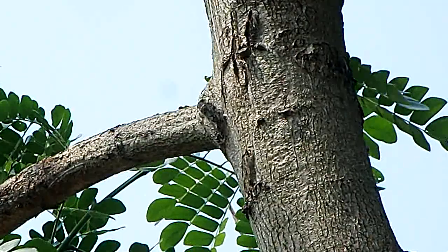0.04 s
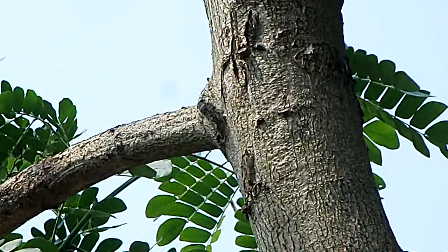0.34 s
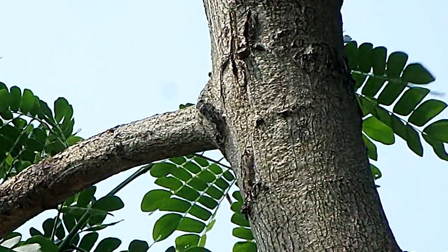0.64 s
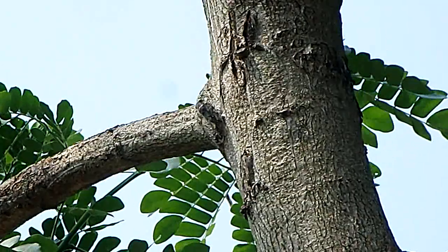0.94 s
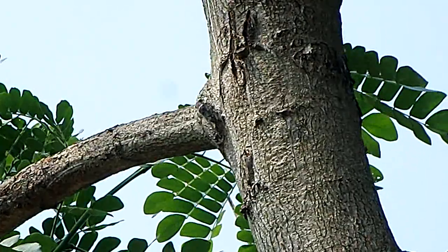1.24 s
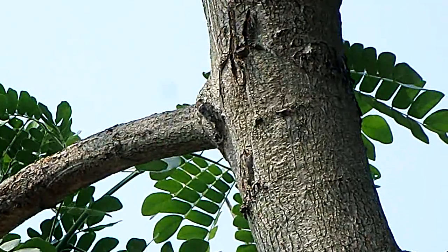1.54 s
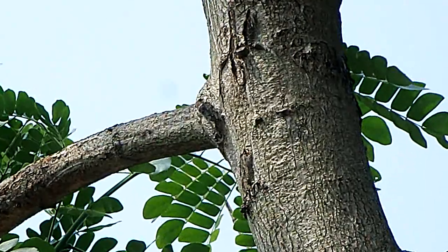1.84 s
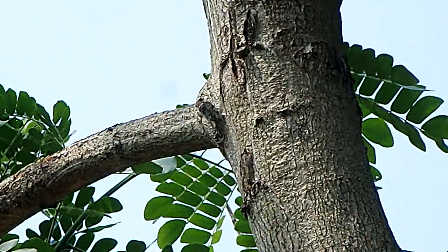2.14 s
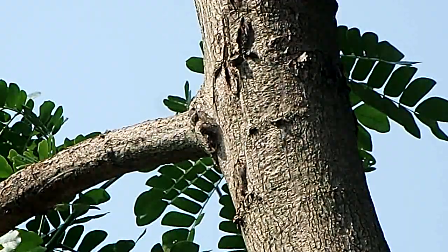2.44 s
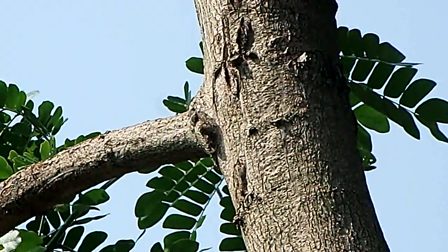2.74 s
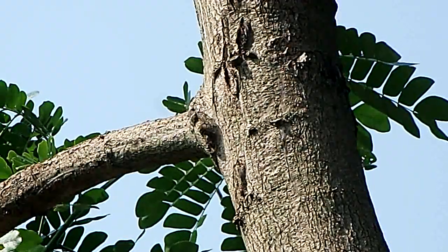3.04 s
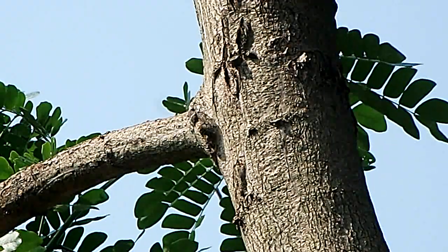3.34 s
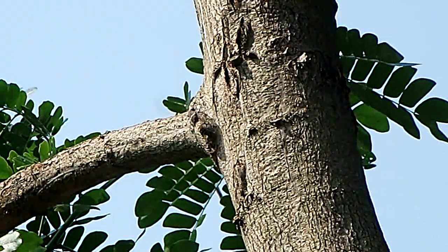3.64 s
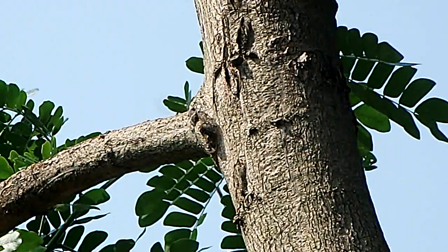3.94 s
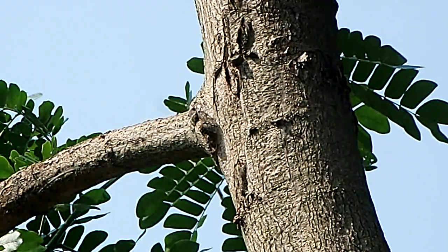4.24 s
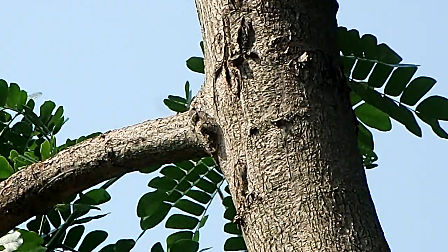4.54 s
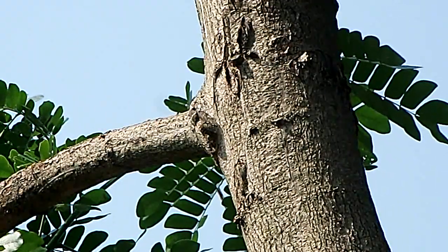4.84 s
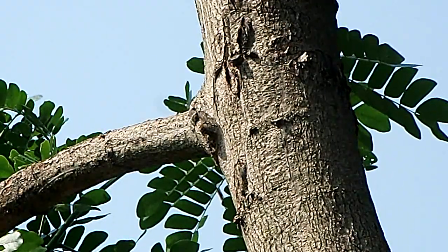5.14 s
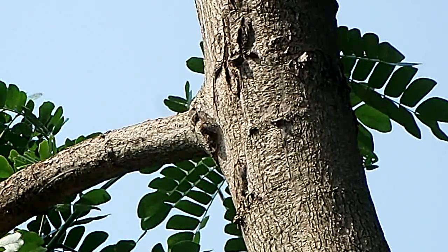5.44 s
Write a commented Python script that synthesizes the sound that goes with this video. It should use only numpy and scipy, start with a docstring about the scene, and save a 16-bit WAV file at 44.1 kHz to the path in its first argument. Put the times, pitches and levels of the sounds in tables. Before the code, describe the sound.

A loud, shrill cicada close to the microphone is the main sound. Before it starts there is only a quiet outdoor hush, a thin hiss of leaves, a far cicada's whine and a few faint bird chirps. The buzz cuts in suddenly with a fast throb and soon smooths into a steady rasp with small swells of sizzle, while light gusts make low thumps and rumbles on the microphone.

```python
"""A cicada bursts into song close by: each muscle stroke buckles a run of tymbal ribs, a click apiece,
and the clicks ring at a few narrow pitches. The buzz throbs at first, then the strokes
join into an even, louder rasp whose sizzle swells five times. Before the song a far cicada whines and a
small bird chirps; during it, puffs of wind thump on the microphone. Faint tones, a low outdoor hush
and the hiss of leaves form the background."""
import sys
import numpy as np
from scipy import signal
from scipy.fft import rfft, irfft
from scipy.io import wavfile
from scipy.ndimage import uniform_filter1d

SR = 44100
rng = np.random.default_rng(int(sys.argv[2]) if len(sys.argv) > 2 else 0)


def wav_out(sig):
    """Save sig, one row per channel (or a flat mono array), as 16-bit PCM at SR to the path in sys.argv[1]."""
    wavfile.write(sys.argv[1], SR, np.round(np.clip(np.atleast_2d(sig).T, -1, 1) * 32767).astype(np.int16))


N = 250047
T = np.arange(N) / SR

# Spectrum of one rib click. Each row: frequency in Hz, relative level in dB.
CLICK_SPECTRUM = [(300, -36.5), (2500, -32.5), (3700, -31.5), (4200, -14.5), (4600, -8.5), (5600, 2),
                  (6300, 1), (6900, -1), (7800, -4), (9000, -9.5), (9900, -12), (10800, -25),
                  (12500, -25.5), (16000, -23.5)]
# Narrow ringing peaks in the buzz. Each row: frequency in Hz, bandwidth in Hz, peak gain in dB.
BUZZ_PEAKS = [(4510, 70, -5), (4670, 60, -8), (4910, 100, 0), (5690, 140, -10), (6850, 300, -12),
              (7570, 150, -9)]
# Spectra of the crackle and sizzle on the clicks. Each row: frequency in Hz, relative level in dB.
CRACKLE_SPECTRUM = [(100, -1), (500, -7.5), (1500, -5.5), (3000, -6.5), (8000, 0), (12000, -8.5),
                    (16000, -10)]
SIZZLE_SPECTRUM = [(6000, -45), (9500, 12.5), (11000, 1.5), (13000, 8), (16000, -18.5)]
# Syllables of the far cicada, each lasting until the next. Each entry: start in seconds.
SYLLABLE_STARTS = [-.02, .285, .58, .86, 1.16, 1.4, 1.61, 1.87, 2.1]
# Body resonance of the far cicada. Each row: frequency in Hz, gain in dB.
FAR_BODY_RESPONSE = [(2500, -20), (3100, -21), (3450, -9), (3900, -9), (4300, -1.5), (4700, -8.5),
                     (5200, -15), (6000, -44), (7800, -25), (9000, -29)]
# Bird chirps. Each row: middle in seconds, length in seconds, start and end in Hz of the glide
# that the arch bends, level in dB.
BIRD_CHIRPS = [(0.089, 0.12, 4460, 4180, -39.5), (0.497, 0.085, 4460, 4200, -40),
               (0.922, 0.093, 4250, 4360, -41), (1.255, .1, 4330, 4340, -40), (1.41, .07, 7100, 6240, -53),
               (1.684, 0.081, 4300, 4260, -38), (2.051, 0.09, 4370, 4270, -36),
               (2.21, 0.16, 7900, 6400, -59)]
# Gusts on the microphone. Each row: middle in seconds, length in seconds, level in dB.
WIND_GUSTS = [(2.68, .24, -38), (2.88, 0.48, -37), (3.346, 0.7, -40), (3.73, 0.16, -38),
              (4.043, 0.37, -41.5), (4.303, 0.14, -41.5), (4.728, 0.31, -43.5), (5.19, .18, -40)]
# Single puffs. Each row: middle in seconds, relative level in dB.
WIND_PUFFS = [(2.765, -17), (2.835, -21), (2.862, -16.5), (2.915, -14), (2.975, -26), (3.278, -20),
              (3.408, -30), (3.497, -25.5), (3.555, -31), (3.699, -26), (3.859, -24.5), (3.967, -20),
              (4.025, -14.5), (4.309, -28), (5.197, -33)]
# Spectra of the wind's rumble and puffs. Each row: frequency in Hz, relative level in dB.
RUMBLE_SPECTRUM = [(20, -23), (45, 0), (80, 1.5), (140, -3.5), (200, -14), (320, -30), (700, -35.5)]
PUFF_SPECTRUM = [(20, -22), (70, -4), (130, 0), (200, -7), (320, -20.5), (700, -60)]
# Faint far tones. Each row: middle in seconds, length in seconds, frequency in Hz, peak level in dB.
DISTANT_TONES = [(1.26, 0.61, 660, -51), (1.02, 0.66, 1750, -56.5)]
# Spectra of the outdoor hush and the leaves. Each row: frequency in Hz, relative level in dB.
HUSH_SPECTRUM = [(25, -21), (55, -10), (110, -4), (180, -7.5), (260, -11), (400, -10.5), (550, -10.5),
                 (800, -11), (1300, -14.5), (1700, -18.5), (2300, -22.5), (3200, -31.5), (5000, -57)]
LEAF_SPECTRUM = [(1500, -22), (3000, 5), (5000, 3.5), (8000, -2.5), (11000, -3.5), (16000, -5)]
# Low hum behind the hush. Each row: frequency in Hz, rms level in dB.
HUM_TONES = [(183, -57), (387.6, -60.5)]

SONG_START_S = 2.3735
JOIN_MIDDLE_S, JOIN_LENGTH_S = 3.62, .16   # the throb turns into the rasp


def cicada(throb_db=-15, rasp_db=-13):
    """Pulse train: rapid tymbal clicks fuse into a buzz that rings at a few pitches and grows louder."""
    clicks = tymbals()
    buzz = clicks + sum(from_db(db) * resonance(clicks, hz, width) for hz, width, db in BUZZ_PEAKS)
    buzz = foliage(buzz, t60=.1, wet_db=-13)
    buzz = buzz / np.std(buzz[T >= SONG_START_S])
    level_db = throb_db + (rasp_db - throb_db) * ramp(middle=3.54, length=.86)
    return from_db(level_db) * (buzz + crackle(buzz)) + sizzle(buzz)


def tymbals(twin_s=.000267, twin_db=-12, rebound_s=.0009594, rebound_db=-5):
    """Superposition: the second tymbal clicks just after the first; a thin, inverted rebound follows."""
    times, sizes = ribs()
    scatter = rng.standard_normal((len(times), 2))
    twins = times + twin_s + .00004 * scatter[:, 0]
    rebound_lag = rebound_s + .000014 * scatter[:, 1]
    snaps, rebound = [impulses(times + lag, sizes) + from_db(twin_db) * impulses(twins + lag, sizes)
                      for lag in (0, rebound_lag)]
    rebound = signal.sosfiltfilt(signal.butter(2, 4500, "high", fs=SR, output="sos"), rebound)
    clicks = coloured(snaps - from_db(rebound_db) * rebound, CLICK_SPECTRUM)
    return dispersion(clicks, hz=5510, width=2650)


def ribs(slowing=.1404, slack_db=-5.5, uneven_db=.51, jitter_s=.000009):
    """Buckling: each rib snaps once, fast early in a stroke and slower late. Gives times and sizes."""
    stroke_hz, rib_hz, slack_share, unsteady = muscle()
    singing = T >= SONG_START_S
    strokes = np.cumsum(singing * stroke_hz * (1 + unsteady * .06 * drift(50))) / SR
    stroke_phase = (strokes - 1 / 3) % 1
    pace = 1 - slowing * (stroke_phase - .5) + unsteady * .0065 * drift(50)
    buckled = np.cumsum(singing * rib_hz * pace) / SR
    times = np.interp(np.arange(int(buckled[-1])), buckled[singing], T[singing])
    # ribs that buckle while the muscle is slack click softly
    slack = uniform_filter1d(1. * (stroke_phase > 1 - slack_share), size=SR // 250)
    scatter = rng.standard_normal((len(times), 2))
    sizes = from_db(slack_db * np.interp(times, T, slack) + uneven_db * scatter[:, 0])
    sizes = sizes / np.sqrt(uniform_filter1d(sizes ** 2, size=36))   # even power over 36 clicks
    return times + jitter_s * scatter[:, 1], sizes


def muscle(quickening_hz_per_s=1.0):
    """Periodic drive: a slack part in each stroke makes the throb, and vanishes as the strokes join."""
    # Each row: stroke rate in Hz, rib rate in Hz, slack share of a stroke, unsteadiness.
    throb = (47.45 + quickening_hz_per_s * (T - SONG_START_S), 437.2, .37, .17)
    rasp = (51.7, 429.2, 0, .97)
    joined = ramp(JOIN_MIDDLE_S, JOIN_LENGTH_S)
    return [before + (after - before) * joined for before, after in zip(throb, rasp)]


def crackle(buzz, crackle_db=-19.5, hiss_db=-32):
    """Amplitude modulation: broadband noise rides on every click, with a smooth hiss between them."""
    envelope = from_db(crackle_db) * np.abs(buzz) + from_db(hiss_db) * (T >= SONG_START_S)
    return envelope * noise(CRACKLE_SPECTRUM)


def sizzle(buzz, fade_db_per_s=3.5, swell_every_s=.243, strongest_s=4.44):
    """Modulated noise: each click spits a little treble, which swells in a series that rises and fades."""
    throb_db, rasp_db, swell_db = -29, -33, -21.5   # gains on half the rectified buzz
    base_db = throb_db + (rasp_db - throb_db) * ramp(JOIN_MIDDLE_S, JOIN_LENGTH_S)
    base = from_db(base_db - fade_db_per_s * (T - SONG_START_S))
    middles_s = 3.86 + swell_every_s * np.arange(5)
    swells = sum(from_db(swell_db - 8.5 * abs(s - strongest_s)) * bump(s, .125) for s in middles_s)
    return (base + swells) * noise(SIZZLE_SPECTRUM) * np.abs(buzz) / 2


def far_cicada(waver=.0052, flutter_db=4, edge_s=.022, fade_from_s=1.4, fade_db_per_s=3.5):
    """Formant filtering: of a pulse tone that sags in each syllable, harmonics near resonance carry."""
    spans = np.transpose([SYLLABLE_STARTS, SYLLABLE_STARTS[1:] + [SONG_START_S + edge_s]])
    age = spans[:, 0] - SYLLABLE_STARTS[0]
    # as the insect warms up, the pitch at each end of a syllable climbs and settles
    head_hz = 871 - 74 * np.exp(-age / .25)
    tail_hz = 865 - 103 * np.exp(-age / .54)
    pitch = np.interp(T, spans.ravel(), np.column_stack([head_hz, tail_hz]).ravel())
    pitch *= 1 + waver * drift(200)
    gate = sum(np.clip(np.minimum(T - start, end - T) / edge_s, 0, 1) for start, end in spans)
    level = gate * from_db(-46.5 - fade_db_per_s * np.maximum(T - fade_from_s, 0))
    phase = 2 * np.pi * np.cumsum(pitch) / SR
    tone = sum(from_db(at_hz(FAR_BODY_RESPONSE, k * pitch) + flutter_db * drift(100)) * np.sin(k * phase)
               for k in range(3, 11))
    return foliage(level * tone, t60=.35, wet_db=-7)


def bird(arch=.062, octave_db=-22.5):
    """Frequency modulation: each short whistle arches in pitch and carries a faint second harmonic."""
    song = np.zeros(N)
    for middle, length, start_hz, end_hz, db in BIRD_CHIRPS:
        along = np.clip((T - middle) / length, -.5, .5)
        glide_hz = start_hz + (end_hz - start_hz) * (along + .5)
        pitch = glide_hz * (1 - arch * (2 * along) ** 2)
        phase = 2 * np.pi * np.cumsum(pitch) / SR
        whistle = np.sin(phase) + from_db(octave_db) * np.sin(2 * phase)
        song += from_db(db) * bump(middle, length) * whistle
    return foliage(song, t60=.53, wet_db=-5.5)


def wind(breeze_db=-55, lumpy_db=4, puff_gain_db=-5.5, puff_s=.027):
    """Pressure fluctuation at the microphone: gusts rumble over a light breeze, and single puffs thump."""
    breeze = from_db(breeze_db) * ramp(middle=2.55, length=.1)
    gusts = sum(from_db(db) * bump(middle, length) for middle, length, db in WIND_GUSTS)
    rumble = (breeze + gusts) * from_db(lumpy_db * drift(60)) * noise(RUMBLE_SPECTRUM)
    puffs = sum(from_db(db + puff_gain_db) * bump(middle, puff_s) for middle, db in WIND_PUFFS)
    return rumble + puffs * noise(PUFF_SPECTRUM)


def faint_tones(steady_hz=576, steady_db=-54.5):
    """Sinusoids: a steady one lies under the song; two with wandering phase come and go before it."""
    steady = from_db(steady_db) * np.sqrt(2) * np.sin(2 * np.pi * steady_hz * T) * (T > SONG_START_S)
    return steady + sum(from_db(db) * bump(middle, length) * np.sin(2 * np.pi * hz * T + drift(30))
                        for middle, length, hz, db in DISTANT_TONES)


def outdoors(hush_db=-44.5, sway_db=.14, leaves_db=-52.5, waver_rad=.65):
    """Ambient noise floor: a distant low hush, a thin hiss of leaves and a phase-modulated hum."""
    hush = from_db(hush_db - sway_db * drift(11)) * noise(HUSH_SPECTRUM)
    leaves = from_db(leaves_db) * noise(LEAF_SPECTRUM)
    hum = sum(from_db(db) * np.sqrt(2) * np.sin(2 * np.pi * hz * T + waver_rad * drift(15))
              for hz, db in HUM_TONES)
    return hush + leaves + hum


def foliage(x, t60, wet_db):
    """Scattering: leaves and branches add a diffuse tail that decays at 60 dB per t60 seconds."""
    t = T[:SR // 3]
    tail = rng.standard_normal(len(t)) * from_db(-60 * t / t60) * (t > .002)
    return x + from_db(wet_db) * signal.fftconvolve(x, tail / np.linalg.norm(tail))[:N]


def resonance(x, hz, width):
    """Damped oscillator: a two-pole resonance with unit gain at its peak."""
    r = np.exp(-np.pi * width / SR)
    poles = [1, -2 * r * np.cos(2 * np.pi * hz / SR), r * r]
    return signal.lfilter(np.array([1, 0, -1]) * (1 - r * r) / 2, poles, x + 1e-18)


def dispersion(x, hz, width):
    """Group delay: an all-pass holds back the band around hz, so a click stretches and falls in pitch."""
    r = np.exp(-np.pi * width / SR)
    poles = np.array([1, -2 * r * np.cos(2 * np.pi * hz / SR), r * r])
    return signal.lfilter(poles[::-1], poles, x)


def impulses(times, sizes, reach=8):
    """Band-limited interpolation: a windowed sinc places each impulse between the samples."""
    at = times[:, None] * SR
    taps = np.floor(at).astype(int) + np.arange(1 - reach, reach + 1)
    shape = np.sinc(taps - at) * np.sinc((taps - at) / reach)
    return np.bincount(taps.ravel(), (sizes[:, None] * shape).ravel(), N)[:N]


def coloured(x, spectrum, size=8192):
    """Minimum-phase filtering: folding the cepstrum gives a causal response with this spectrum."""
    gain = from_db(at_hz(spectrum, np.arange(size // 2 + 1) * SR / size))
    cepstrum = irfft(np.log(gain))
    cepstrum[1:size // 2] *= 2
    cepstrum[size // 2 + 1:] = 0
    return signal.fftconvolve(x, irfft(np.exp(rfft(cepstrum))))[:N]


def noise(spectrum):
    """Filtered white noise of unit rms."""
    return rms_one(coloured(rng.standard_normal(N), spectrum))


def drift(rate):
    """Band-limited fluctuation of unit rms, with about `rate` random values a second."""
    count = int(rate * N / SR) + 2
    return rms_one(signal.resample(rng.standard_normal(count), N))


def at_hz(spectrum, hz):
    """Level in dB, interpolated on a log-frequency axis."""
    knots_hz, db = np.transpose(spectrum)
    return np.interp(np.log(np.maximum(hz, 1)), np.log(knots_hz), db)


def bump(middle, length):
    """Raised-cosine envelope of height 1; times in seconds."""
    return np.cos(np.pi * np.clip((T - middle) / length, -.5, .5)) ** 2


def ramp(middle, length):
    """Linear rise from 0 to 1; times in seconds."""
    return np.clip((T - middle) / length + .5, 0, 1)


def from_db(db):
    """Amplitude ratio of a level in decibels."""
    return 10 ** (np.asarray(db) / 20)


def rms_one(x):
    """Normalisation to unit rms."""
    return x / np.sqrt(np.mean(x ** 2) + 1e-20)


def scene():
    """Superposition: all sources add at one microphone, the same in both channels."""
    mono = cicada() + faint_tones() + far_cicada() + bird() + wind() + outdoors()
    return np.stack([mono, mono])


def record(dry, cutoff_hz=15750):
    """Band limiting: an elliptic low-pass cuts the top steeply."""
    return signal.sosfilt(signal.ellip(12, .1, 80, cutoff_hz, fs=SR, output="sos"), dry)


dry = scene()
out = record(dry)
wav_out(out)
```